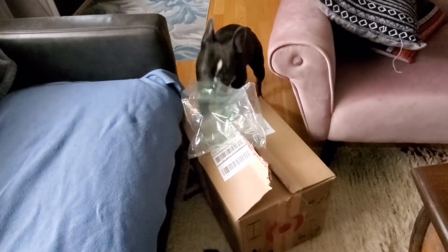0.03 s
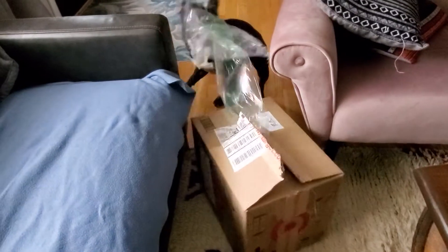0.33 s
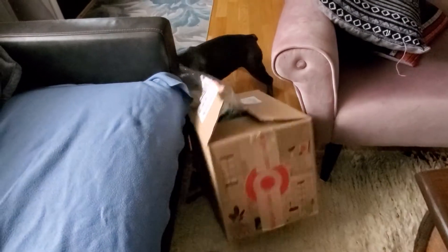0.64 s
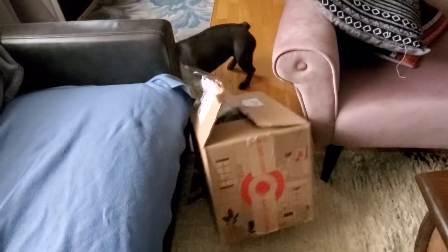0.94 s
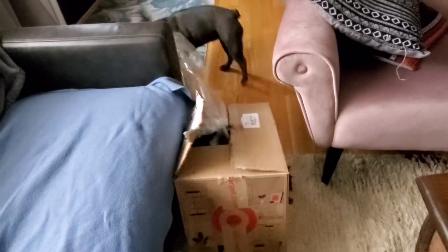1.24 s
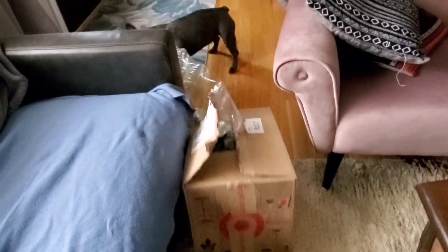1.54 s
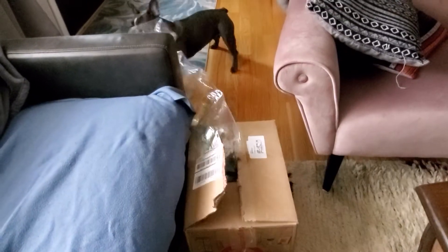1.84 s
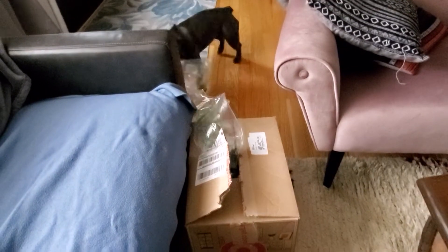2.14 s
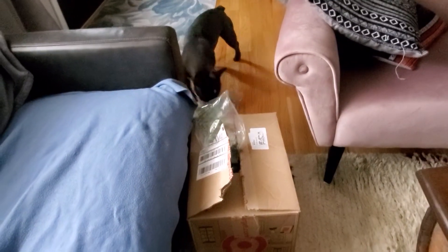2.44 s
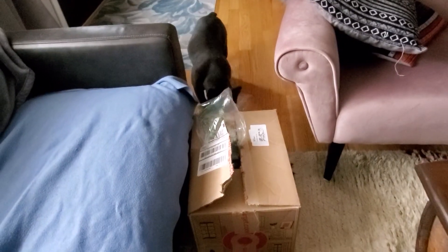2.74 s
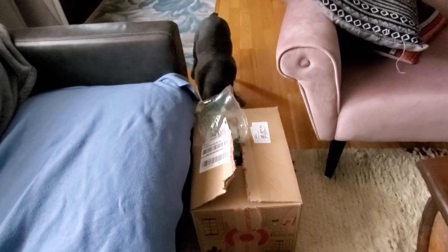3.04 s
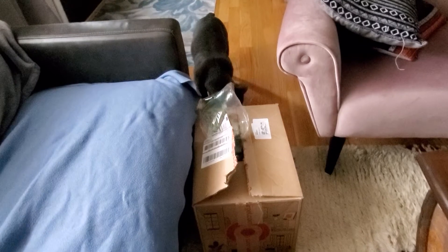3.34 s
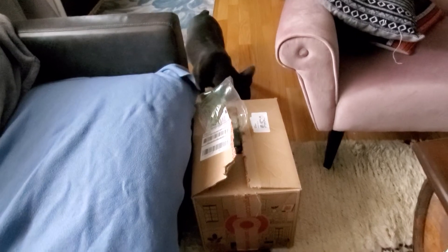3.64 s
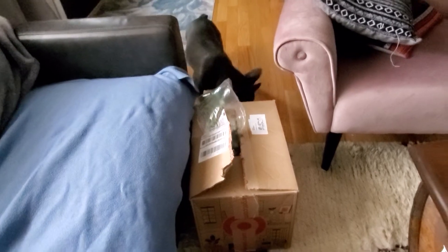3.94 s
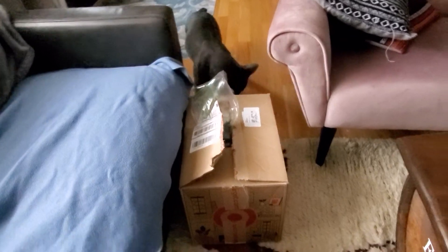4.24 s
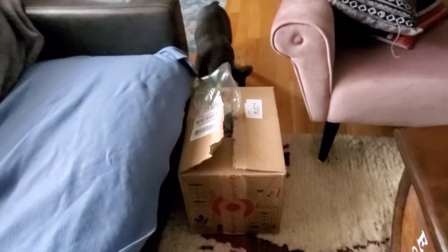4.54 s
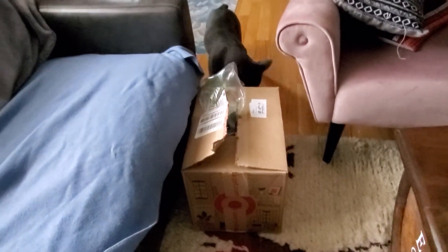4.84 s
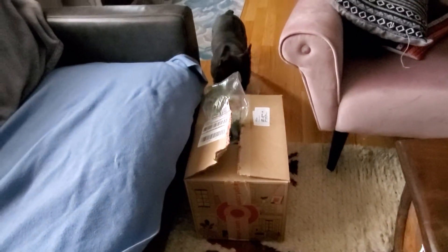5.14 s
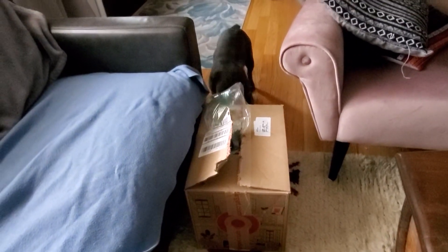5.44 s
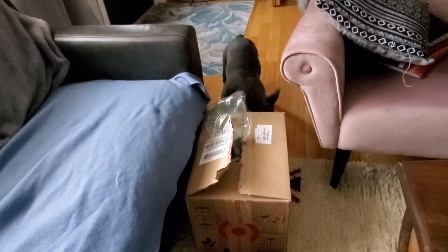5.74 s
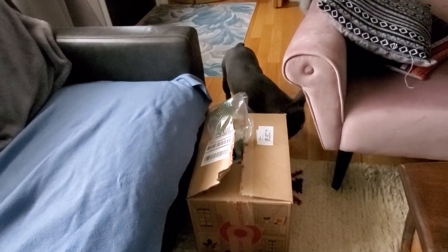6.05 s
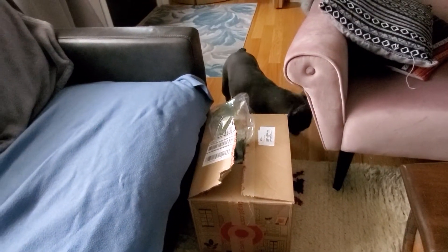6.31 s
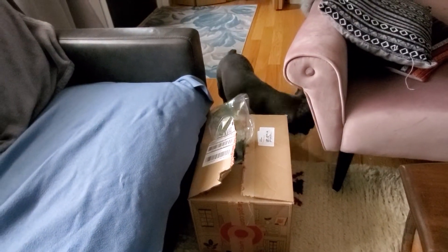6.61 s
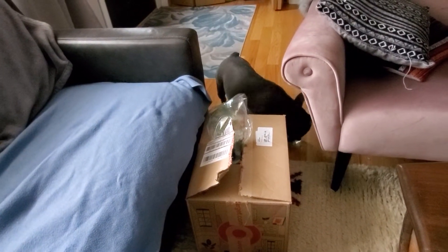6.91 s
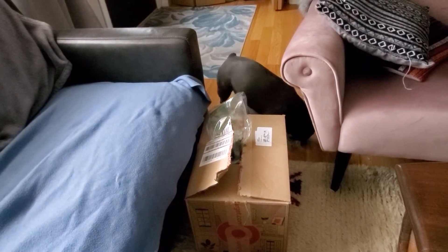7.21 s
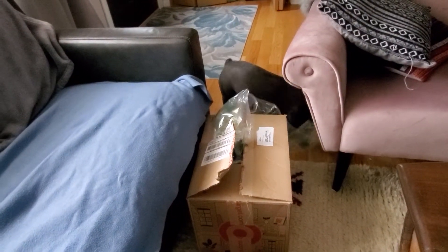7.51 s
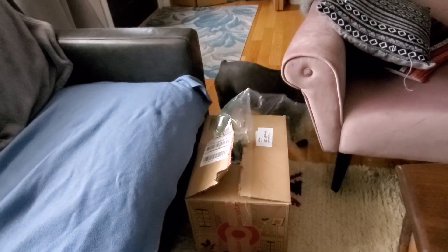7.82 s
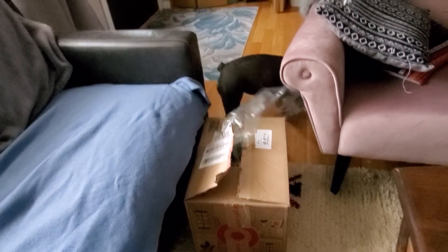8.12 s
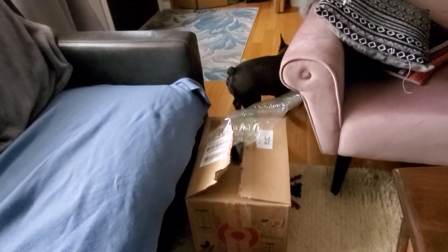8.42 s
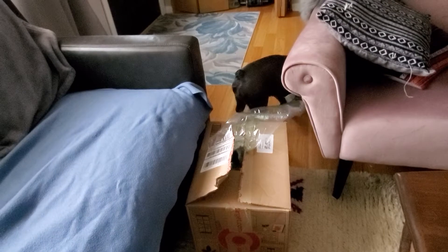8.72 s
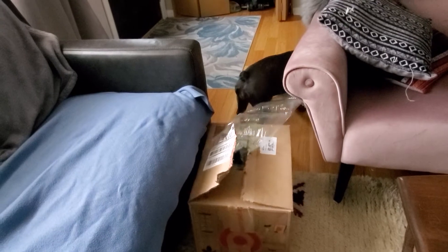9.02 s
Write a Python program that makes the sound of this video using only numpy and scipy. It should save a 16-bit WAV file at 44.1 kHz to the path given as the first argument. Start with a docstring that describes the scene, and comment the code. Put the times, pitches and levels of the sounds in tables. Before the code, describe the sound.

A small dog tugs a plastic bag out of a cardboard box in a quiet living room, heard from a hand-held phone a couple of metres away. For the first two seconds, plastic crinkles and snaps in strong bursts over scraping cardboard, with hollow box knocks at about 0.6 and 1.4 seconds and dull floor bumps. From 2 to 4 seconds the rustling is softer and patchy. At 4.3 seconds comes the loudest event, a low, hollow knock with sharp plastic cracks. Smaller knocks and crackles follow around 5 seconds, between 6 and 6.6, and at 7.6. Tiny plastic squeaks occur near 2.2 and 6.6 seconds. Fingers thump the phone on the right, most clearly at 8 seconds. The crinkling turns thinner and brighter late on, with a last snap and knock at 9 seconds. A faint low hum and hiss run underneath, and the room echo is short.

```python
"""In a living room, a small dog drags a plastic bag out of a cardboard box and noses at it on the floor.
The plastic crinkles and snaps as its folds give way, and squeaks when rubbed. Cardboard scrapes,
the hollow box is knocked about, and the furnished room rings briefly. A hand-held phone a couple
of metres away also picks up a few dull bumps, the fingers that hold it and a low hum."""
import sys
import numpy as np
from scipy import signal
from scipy.fft import rfft, irfft, next_fast_len
from scipy.io import wavfile

SR = 44100
rng = np.random.default_rng(int(sys.argv[2]) if len(sys.argv) > 2 else 0)


def file_out(sig):
    """Save sig as 16-bit WAV at sys.argv[1]."""
    # one column per channel
    cols = np.atleast_2d(sig).T
    # limit, then scale
    lim = np.clip(cols, -1, 1)
    pcm = np.round(lim * 32767).astype(np.int16)
    wavfile.write(sys.argv[1], SR, pcm)


N = 399987
TIME = np.arange(N) / SR
SIDES = np.array([[1], [-1]])  # plus for left, minus for right
TOP_HZ = 15900

# Where the dog's nose is. Each row: time in seconds, left side's lag in samples, left minus right in dB.
BEARING = [(0, -1, -1.7), (1.5, -1, 0), (3.9, -1.5, -0.5), (4.3, 1, 0.8), (5.1, 2.5, 0), (7.1, 3.5, -1.5),
           (8.0, 1, 0.2), (9.07, 2.5, -1.1)]
# How much of the room's sound differs between left and right. Each row: pitch in Hz, share in dB.
STEREO_SPREAD = [(60, -14), (150, -15.5), (300, -12.5), (600, -4.5), (1200, 1.5), (16000, -1)]


def amp(db):
    """Turn decibels into a gain."""
    return 10 ** (np.asarray(db) / 20)


def rms(x):
    """The average strength of a sound (root mean square)."""
    return np.sqrt(np.mean(x ** 2))


def fade(t, t60):
    """Die away smoothly, 60 dB down after t60 seconds."""
    return np.exp(-np.log(1000) * t / t60)


def walk(rate):
    """Wander at random by about 1, with a new target `rate` times a second."""
    knots = np.arange(0, TIME[-1] + 1, 1 / rate)
    return np.interp(TIME, knots, rng.standard_normal(len(knots)))


def add(track, s, sound):
    """Mix a sound into a track at s seconds."""
    i = max(int(s * SR), 0)
    track[i:i + len(sound)] += sound[:N - i]


def band(x, lo, hi):
    """Gently keep the pitches between lo and hi Hz."""
    return signal.sosfilt(signal.butter(1, [lo, min(hi, TOP_HZ)], "bandpass", fs=SR, output="sos"), x)


def colour(x, points, tilt_db=0, size=4096):
    """Shape the tone along (Hz, dB) points, tilted by tilt_db for each octave."""
    hz, db = np.transpose(points)
    octave = np.log2(np.maximum(np.fft.rfftfreq(size, 1 / SR), 1))
    curve_db = np.interp(octave, np.log2(hz), db + tilt_db * np.log2(hz / hz.mean()))
    # build the filter so that it never rings ahead of the sound
    cepstrum = irfft(np.log(amp(curve_db)))
    cepstrum[1:size // 2] *= 2
    cepstrum[size // 2 + 1:] = 0
    return signal.oaconvolve(x, irfft(np.exp(rfft(cepstrum))))[:len(x)]


def still_room():
    """The air rumbles and hisses softly under a low, wavering hum."""
    # The tone of the still air. Each row: pitch in Hz, relative level in dB.
    air_tone = [(12, -33), (20, 4), (90, 1), (157, -6), (207, -5), (266, -6.5), (857, -16.5), (932, -22),
                (1770, -14.5), (2470, -20), (4950, -20.5), (9930, -33.5), (15500, -38)]
    # The notes of the hum. Each row: pitch in Hz, level in dB.
    hum_notes = [(43.1, -81), (86.1, -63), (215.3, -71)]
    middle, side = (colour(rng.standard_normal(N), air_tone) for _ in range(2))
    air = (middle + SIDES * colour(side, STEREO_SPREAD)) / rms(middle)
    hum = np.zeros(N)
    for hz, db in hum_notes:
        strength = amp(db + 3.1 * walk(9.3)) * np.sqrt(2)
        hum += strength * np.sin(2 * np.pi * hz * TIME + 2.6 * walk(4))
    return amp(-54.5) * air + hum


def echoes(t):
    """Sound bounces off floor and furniture first, then leaves a tail that grows duller."""
    scatter = rng.standard_normal(len(t))
    dull = signal.lfilter([.4], [1, -.6], scatter)
    tail = dull * fade(t, t60=0.42) + (scatter - dull) * fade(t, t60=0.32)
    tail = tail * (1 + 1.75 * fade(t, t60=0.14)) * (t > .002)
    return tail / np.sqrt(np.sum(tail ** 2))


def room(x, wet_db, size=1024, count=14):
    """Bag and box are wide and keep moving, so each slice of sound echoes from another spot."""
    out, t = np.zeros((2, N)), TIME[:SR // 3]
    length = next_fast_len(len(t) + size)
    spots = [rfft(echoes(t) + SIDES * colour(echoes(t), STEREO_SPREAD, size=1024), length)
             for _ in range(count)]
    nose_s, nose_lag, _ = np.transpose(BEARING)
    for k, start in enumerate(range(-size // 2, N, size // 2)):
        i = np.arange(max(start, 0), min(start + size, N))
        window = np.sin(np.pi * (i - start) / size)
        lag = round(np.interp(i.mean() / SR, nose_s, nose_lag) + rng.standard_normal())
        if not x[i].any():
            continue
        wet = amp(wet_db) * irfft(rfft(x[i] * window, length) * spots[k % count], length)
        for track, echo, delay in zip(out, wet, (max(lag, 0), max(-lag, 0))):
            add(track, (i[0] + delay + .5) / SR, x[i] * window ** 2)
            add(track, i[0] / SR, echo)
    return out / np.sqrt(1 + amp(wet_db) ** 2)


def thump(hz, t60, push_db, tick_db):
    """A soft thump: a tick at first touch, one short push and a few low swings."""
    t = TIME[:SR // 3]
    push = amp(push_db) * np.sin(2 * np.pi * 330 * t) * fade(t, 0.0061)
    tick = amp(tick_db) * band(rng.standard_normal(len(t)), 500, 6600) * fade(t, 0.0059)
    return np.sin(2 * np.pi * hz * t) * fade(t, t60) - 2.46 * push + tick


def fingers():
    """Fingers tap the phone's case close to its right microphone."""
    # The taps. Each row: start in seconds, level in dB, pitch in Hz, ring time in seconds,
    # then push and tick in dB compared with the ring.
    taps = [(0.52, -32, 45, 0.24, -20, -40), (4.582, -27, 64.6, 0.067, -20, -43),
            (7.43, -24, 47.4, 0.13, -13, -40), (8.019, -17.5, 83, 0.068, -0.5, -8),
            (8.25, -24.5, 190, .007, 8.5, -12)]
    out = np.zeros(N)
    for s, db, hz, t60, push_db, tick_db in taps:
        add(out, s, amp(db) * thump(hz, t60, push_db, tick_db))
    return out * amp([[-28], [0]])  # little reaches the left side


def bumps():
    """Dull bumps heard on both sides, most of them on the floor; the lower ones ring longer."""
    # The bumps. Each row: start in seconds, level in dB, pitch in Hz.
    dull_hits = [(0.173, -30, 83), (0.62, -35, 59.5), (1.41, -23.5, 81), (1.771, -32, 89.7),
                 (1.859, -40, 69.5), (6.627, -36.5, 140), (7.415, -33, 91)]
    out, swings = np.zeros(N), 11.6
    for s, db, hz in dull_hits:
        add(out, s, amp(db) * thump(hz, t60=swings / hz, push_db=-6, tick_db=-36))
    return out


def squeaks():
    """Rubbed plastic sticks and slips fast enough to give a short, scratchy tone."""
    # The rubs. Each row: start and length in seconds, first and last pitch in Hz, level in dB.
    rubs = [(2.24, 0.042, 1320, 1060, -53), (6.631, 0.025, 1920, 2050, -43.5)]
    out = np.zeros(N)
    for s, length, start_hz, end_hz, db in rubs:
        n = int(length * SR)
        hz = np.linspace(start_hz, end_hz, n) * (1 + .03 * walk(900)[:n])
        grip = amp(5.4 * walk(500)[:n])
        add(out, s, amp(db) * grip * np.hanning(n) * np.sin(2 * np.pi * np.cumsum(hz) / SR))
    return out


def knocks():
    """A blow on the hollow box sets box and room ringing, most of all near the struck spot's pitch."""
    # The blows. Each row: start in seconds, peak level in dB, pitch of the struck spot in Hz.
    blows = [(0.174, -39, 93.5), (0.388, -30, 409), (0.601, -15.5, 431), (0.611, -27, 415),
             (1.248, -29, 105), (1.37, -16, 797), (1.392, -20, 495), (1.398, -17, 560), (1.442, -25, 390),
             (2.829, -42, 415), (3.882, -35.5, 129), (4.311, -4, 167), (4.614, -32.5, 156),
             (4.744, -32, 794), (4.874, -25.5, 150), (5.119, -39, 91.5), (5.121, -25.5, 143),
             (5.155, -26.5, 94.2), (6.016, -25, 129), (6.253, -19.5, 589), (6.269, -18.5, 201),
             (6.361, -24, 242), (6.524, -37, 200), (6.545, -31.5, 189), (6.566, -39, 230),
             (6.587, -36, 200), (7.565, -21.5, 425), (7.59, -17, 312), (9.01, -22, 440)]
    # The ringing notes of the box and the room around it.
    # Each row: pitch in Hz, relative level in dB, ring time in seconds.
    ring_notes = [(107.8, -35, 0.0404), (147.4, 2, 0.06), (171, -13, 0.21), (216.7, -17, 0.3),
                  (310, -7.5, 0.12), (380.6, -16.5, 0.29), (424.4, -7.5, .15), (450, -11.5, 0.071),
                  (509.5, -6.5, 0.13), (624, -9, 0.12), (776, -8.5, 0.1), (1158, -1.5, 0.024)]
    out, t = np.zeros(N), TIME[:SR // 3]
    hz, note_db, t60 = np.transpose(ring_notes)[:, :, None]
    swing = np.where(hz < 260, -1, 1)  # low notes swing against the high ones
    leak = signal.butter(3, 70, "highpass", fs=SR, output="sos")  # an open box gives no deep bass
    for s, db, spot_hz in blows:
        detune, luck_db = rng.standard_normal((2, len(ring_notes), 1))
        octaves_away = np.abs(np.log2(hz / spot_hz))
        gains = swing * amp(note_db + luck_db - 4.6 * octaves_away)
        notes = gains * fade(t, t60) * np.sin(2 * np.pi * hz * (1 + 0.02 * detune) * t)
        ring = signal.sosfilt(leak, notes.sum(axis=0))
        add(out, s, amp(db) * ring / np.abs(ring).max())
    return out


def clicks(n, rate, scatter_db):
    """Random clicks, about `rate` a second, many small and a few large."""
    sizes = amp(scatter_db * np.minimum(rng.standard_normal(n), 2)) * np.sign(rng.standard_normal(n))
    x = sizes * (rng.random(n) < rate / SR)
    return x / (rms(x) + 1e-12)


def snaps():
    """A fold in the bag pops with a pitched crack and sets off a quick, duller run of small creases."""
    # The folds. Each row: start in seconds, level in dB, pitch in Hz, brightness in dB per octave,
    # trailing crackle in dB.
    folds = [(0.199, -26.5, 1960, 0.5, -29), (0.271, -31, 1130, -1, -12), (0.387, -32.5, 1130, 1.5, -25),
             (0.598, -24, 4500, 3, -11), (0.6105, -27.5, 1190, 2, -22), (0.7831, -35, 2170, -5.5, -14),
             (1.1021, -32, 4710, 3.5, -8), (1.2486, -29, 2160, -2, -13), (1.257, -25.5, 3700, 2.5, -31),
             (1.3639, -25, 3757, 0.5, -22), (1.3707, -20.5, 815, 1, -20), (1.8595, -35, 3000, 4, -16),
             (2.8375, -35.5, 1330, 2, -11), (4.1828, -36.5, 1180, 2.5, -22),
             (4.29, -16.5, 1500, -3.5, -18.5), (4.2987, -22.5, 2420, -4, -10),
             (4.3101, -18, 1144, -2, -15.5), (4.7438, -31, 810, -5, -23.5), (4.8891, -29, 2433, 3, -11),
             (5.1158, -30, 1130, 0, -17), (5.1239, -29.5, 1730, -1, -8), (5.1513, -32, 1890, -1, -12),
             (6.016, -23.5, 1756, 0, -16.5), (6.2541, -22, 810, 0.5, -15.5), (6.27, -18.5, 2110, -2, -20),
             (6.3591, -29.5, 4350, 0, -29), (6.6285, -43, 1400, 2, -16), (7.5647, -31.5, 1490, 1, -11),
             (7.578, -35, 1240, -1.5, -15), (8.3448, -39.5, 1230, 0.5, -13), (9.0096, -29, 1240, -4, -18)]
    # The tone of a snap. Each row: pitch in Hz, relative level in dB.
    snap_tone = [(30, -61), (100, -19.5), (400, 0.5), (850, -1), (1300, -1.5), (2000, 1), (3000, -1),
                 (4200, -4), (5500, -10), (8000, -12.5), (9500, -18), (16000, -17.5)]
    out, t = np.zeros(N), TIME[:SR // 6]
    ring_db, ring_width = 5, 1.043  # the width is a ratio either side of the fold's pitch
    for s, db, hz, bright_db, trail_db in folds:
        crack = rng.standard_normal(len(t)) * fade(t, t60=0.01) * (1 - fade(t, t60=0.0028))
        trail = amp(trail_db) * clicks(len(t), rate=2500, scatter_db=2.6) * fade(t, t60=0.13)
        pop = colour(crack, snap_tone, bright_db) + colour(trail, snap_tone, bright_db - 0.8)
        pop = pop + amp(ring_db) * band(pop, hz / ring_width, hz * ring_width)
        add(out, s, amp(db) * pop / rms(pop[:SR // 250]))  # sized by its first 4 ms
    return out


def crinkle(pops, points, rate, scatter_db, flicker_db, ring_db, count=10):
    """Creases give way one by one: bare pops, plus small patches that each ring at their own pitch."""
    edges = np.geomspace(points[0][0], min(points[-1][0], TOP_HZ), count + 1)
    x = pops
    for lo, hi in zip(edges, edges[1:]):
        x = x + amp(ring_db + flicker_db * walk(25)) * band(clicks(N, rate, scatter_db), lo, hi)
    x = colour(x, points)
    return x / rms(x)


def pull():
    """How strongly plastic, cardboard and box walls sound as each tug swells, holds and goes slack."""
    # The dog's tugs. Each row: time of full pull in seconds, plastic level in dB, rise and hold in
    # seconds, then cardboard scrape and wall rumble in dB compared with the plastic.
    tugs = [(0.104, -49.5, 0.27, .05, -5.5, -11), (0.181, -39.5, 0.081, .04, -3, -8.5),
            (0.262, -35.5, 0.11, 0.011, -1.5, -1), (0.599, -31.5, 0.21, 0.0046, -0.5, -1),
            (0.75, -46.5, 0.59, 0.2, -4.5, -5.5), (1.087, -39, 0.37, 0.036, -3.5, -1.5),
            (1.245, -36.5, 0.044, 0.09, -3.5, 0), (1.364, -32.5, 0.1, 0.042, -0.5, 0),
            (1.482, -48.5, 0.13, 0.07, -5, -0.5), (1.685, -41, 0.13, 0.038, -2.5, -2),
            (1.843, -43.5, 0.07, .005, -4, -3), (2.136, -58, .3, 0.029, -14, -20),
            (2.405, -52.5, .07, 0.044, -5.5, -4.5), (2.6, -49.5, 0.38, 0.11, -4.5, -7.5),
            (2.831, -39.5, 0.046, .005, -1, -2), (2.949, -44.5, 0.13, 0.017, -1, -1),
            (3.263, -55, 0.24, 0.043, 1.5, -5), (3.373, -57.5, 0.16, .03, -2.5, -7),
            (3.682, -54, 0.33, 0.039, 2.5, -3), (3.852, -55.5, 0.11, .12, 5, 5),
            (4.035, -50, 0.12, 0.012, 4.5, -8), (4.135, -53.5, 0.13, 0.22, 4.5, -1),
            (4.304, -45, .03, .01, 7, 8), (4.441, -60, 0.18, 0.047, 3.5, 11.5),
            (4.614, -47.5, 0.13, 0.047, 4.5, 0.5), (4.76, -56, .1, .04, 7.5, 5),
            (4.879, -42, 0.068, 0.0041, 2.5, 6.5), (5.128, -44, 0.15, 0.031, -0.5, 5),
            (5.501, -45.5, 0.23, 0.017, 1.5, -1.5), (5.594, -50, 0.23, 0.069, 2, -0.5),
            (5.728, -49.5, .1, 0.082, 2.5, 3.5), (5.98, -48.5, 0.21, .1, 3, 1),
            (6.25, -43.5, 0.19, 0.061, 0, 2.5), (6.363, -49, 0.018, .01, 5.5, 8.5),
            (6.79, -54, 0.34, 0.022, -5.5, -9), (6.927, -50, 0.16, 0.018, -2, 0),
            (7.016, -55.5, 0.13, .03, 1, -3), (7.205, -49.5, 0.056, 0.016, 2.5, -0.5),
            (7.41, -44.5, 0.31, 0.016, -1.5, -2.5), (7.493, -41, .13, .005, -1, -0.5),
            (7.569, -49.5, 0.023, 0.015, 6.5, 14.5), (7.807, -51, 0.21, .08, -1, 1),
            (8.067, -53.5, 0.2, 0.032, -4, 2), (8.185, -43, 0.14, 0.0094, 3, 3),
            (8.343, -44.5, 0.13, .05, 3.5, 2.5), (8.567, -58.5, 0.23, .04, 1, 0),
            (8.69, -50, 0.12, 0.013, 7.5, 6), (8.873, -46.5, 0.16, 0.013, 0.5, -3),
            (9.002, -45.5, 0.15, 0.071, 4, 4.5)]
    stir_db = (-64, -71.5, -68.5)  # plastic, cardboard and walls never quite rest
    rise_db, slack_db_per_s = 26, 170
    power = amp(stir_db)[:, None] ** 2 * np.ones(N)
    for s, db, rise, hold, card_db, wall_db in tugs:
        near = slice(max(int((s - 2 * rise) * SR), 0), int((s + hold + .5) * SR))
        t = TIME[near] - s
        effort_db = rise_db * np.minimum(t / rise, 0) - slack_db_per_s * np.maximum(t - hold, 0)
        power[:, near] += (amp([0, card_db, wall_db])[:, None] * amp(db + effort_db)) ** 2
    return np.sqrt(power)


def rummaging():
    """Each tug crumples the bag and drags the box, whose walls rumble; all catch and slip together."""
    # The tones of the plastic, its finest creases, scraped cardboard and the box walls.
    # Each row: pitch in Hz, relative level in dB.
    plastic_tone = [(1200, -17), (2300, -7.5), (3000, -3), (4300, -1), (5400, -3.5), (6500, -7), (8000, -6),
                    (12000, -59)]
    crease_tone = [(4000, -14.5), (6000, 2.5), (7000, 0.5), (8200, -2), (9000, -5.5), (12500, 0),
                   (16000, -8)]
    card_tone = [(350, -33), (700, 0.5), (950, -6), (1200, 0), (1500, -2.5), (1900, 0.5), (2500, -3),
                 (3300, -5), (6000, -40.5)]
    wall_tone = [(50, -18.5), (100, 4.5), (160, -6), (270, 1), (340, -1.5), (420, 1), (560, -1),
                 (750, -4.5), (1100, -17.5), (2500, -32.5)]
    # The finest creases grow as the bag is pulled thin.
    # Each row: time in seconds, level in dB compared with the plastic.
    crease_levels = [(0, -10), (0.5, -5), (1.0, -5), (1.35, -8), (2.1, -4.5), (2.7, -9.5), (3.4, -9.5),
                     (4.9, -8), (6.3, -5), (6.8, -0.5), (7.22, -0.5), (7.5, -5), (7.85, -5), (8.15, 1.5),
                     (9.07, 3)]
    plastic_gain, card_gain, wall_gain = pull()
    crease_gain = plastic_gain * amp(np.interp(TIME, *np.transpose(crease_levels)))
    slip_db = 1.3 * walk(130)
    pops = clicks(N, rate=700, scatter_db=4.5)
    plastic = crinkle(pops, plastic_tone, rate=700, scatter_db=2.5, flicker_db=3.5, ring_db=0.5)
    creases = crinkle(pops, crease_tone, rate=700, scatter_db=1.5, flicker_db=1.0, ring_db=0)
    card = crinkle(pops, card_tone, rate=600, scatter_db=7.5, flicker_db=3.5, ring_db=2.5)
    wall = crinkle(pops, wall_tone, rate=400, scatter_db=7, flicker_db=3.5, ring_db=3.5)
    mix = plastic_gain * plastic + crease_gain * creases + card_gain * card + wall_gain * wall
    return mix * amp(slip_db)


def scene():
    """Bag and box echo in the room; bumps and fingers have no echo."""
    nose_s, _, left_db = np.transpose(BEARING)
    bag = room(rummaging(), wet_db=-1.0) + room(snaps(), wet_db=-4.0)
    bag = bag * amp(SIDES * np.interp(TIME, nose_s, left_db) / 2)
    knocks_and_squeaks = room(knocks() + squeaks(), wet_db=-6.0, size=8192)
    return bag + knocks_and_squeaks + bumps() + fingers() + still_room()


def record(dry):
    """Each microphone opening shapes the tone in its own way, and the phone cuts the highest treble."""
    # How the two openings differ. Each row: pitch in Hz, left minus right in dB.
    mic_balance = [(60, 0), (200, 0.5), (380, -0.5), (700, 0), (1290, 2.1), (2380, -1.5), (4400, -9),
                   (6000, -2), (8100, 2.5), (15000, -1.5)]
    mics = [colour(x, [(hz, side * db / 2) for hz, db in mic_balance]) for x, side in zip(dry, (1, -1))]
    return signal.sosfilt(signal.ellip(10, .2, 80, TOP_HZ, fs=SR, output="sos"), mics)


dry = scene()
out = record(dry)
file_out(out)
```